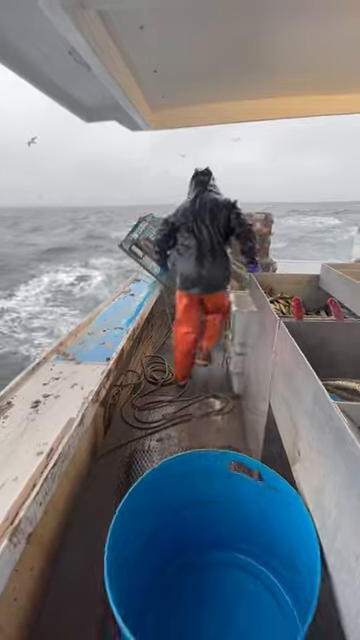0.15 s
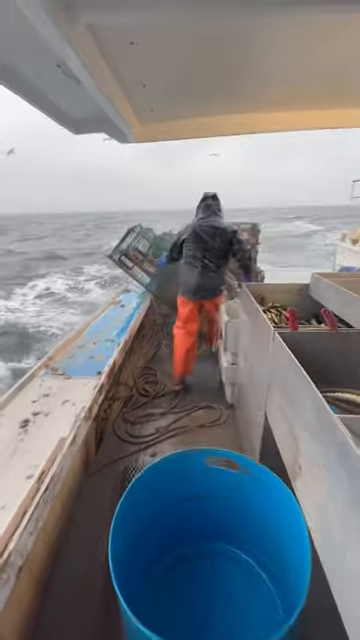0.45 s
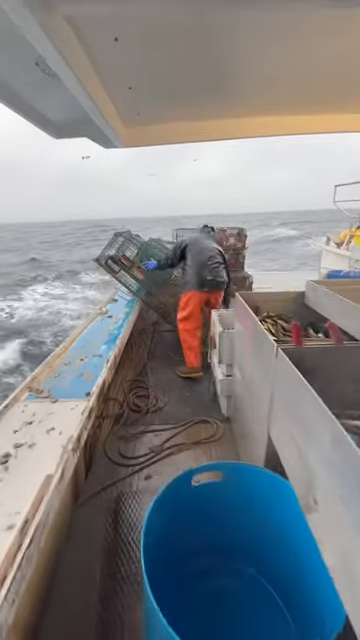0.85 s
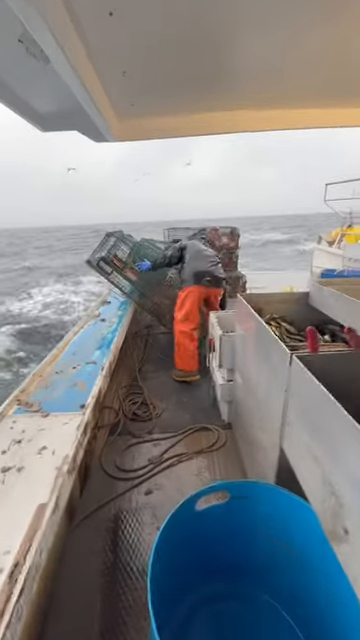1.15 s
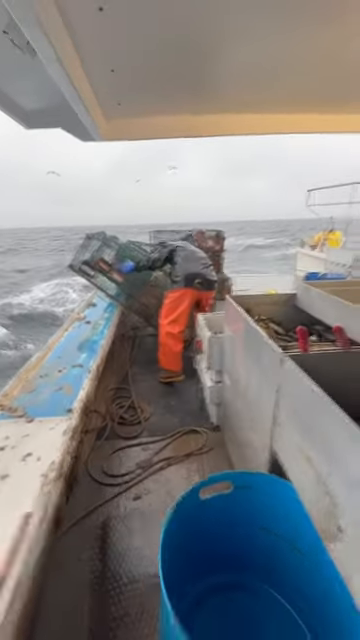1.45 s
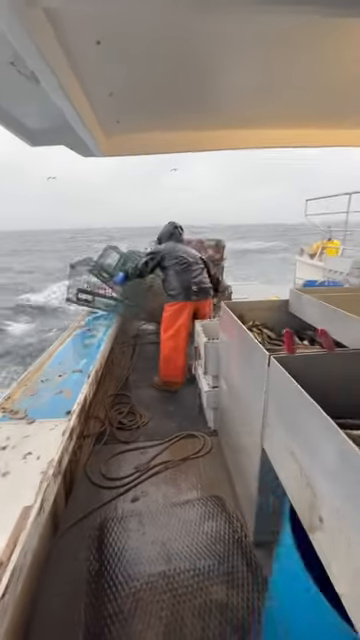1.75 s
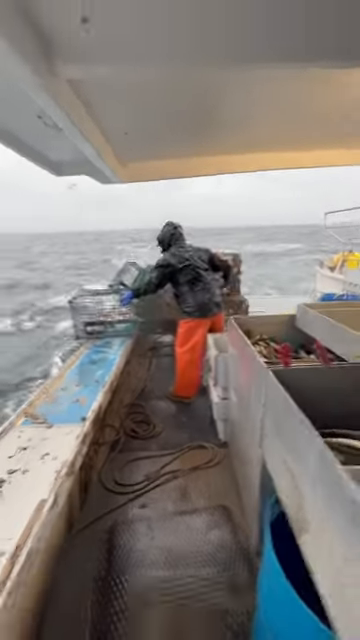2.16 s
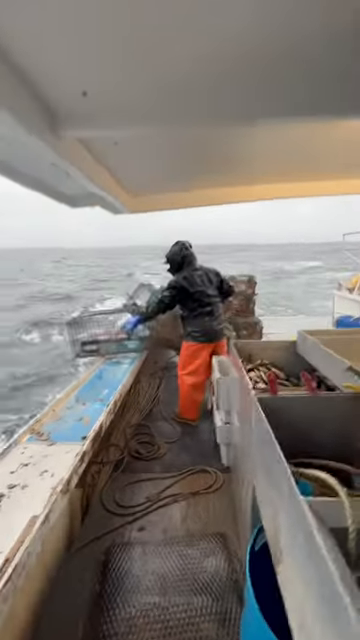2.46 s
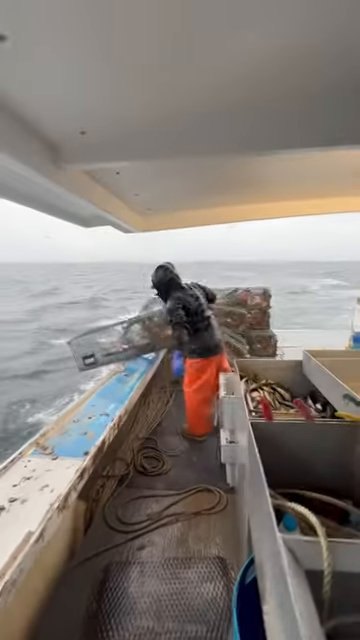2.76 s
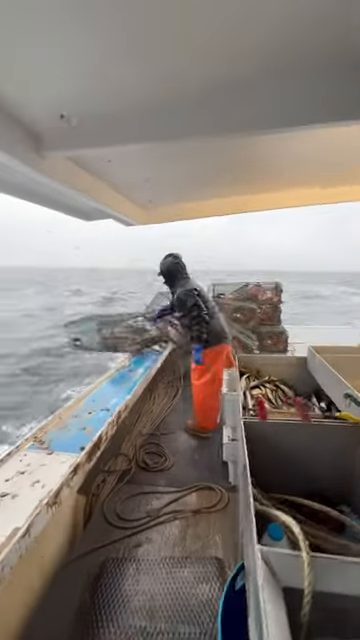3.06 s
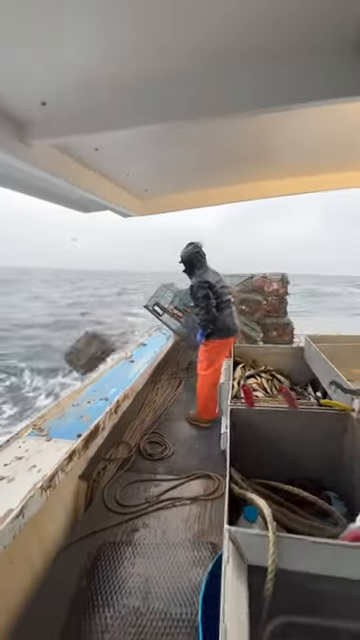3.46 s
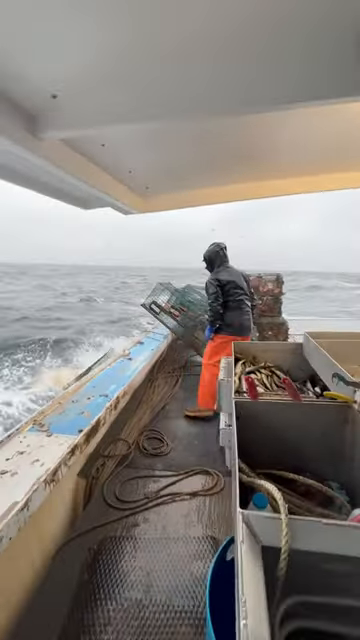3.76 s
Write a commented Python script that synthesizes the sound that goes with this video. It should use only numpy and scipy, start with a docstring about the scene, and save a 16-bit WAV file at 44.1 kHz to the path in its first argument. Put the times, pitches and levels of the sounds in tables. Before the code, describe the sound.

A wire trap knocks on a boat rail: two hollow clunks at 0.2-0.3 s, a faint tap near 0.95, a hard bang at 1.35, then a rapid clattering, grainy scrape from 1.5 to 1.75 and a ringing thunk at 1.95. Softer knocks come at 2.95-3.15; a modest splash swells after 3.6. Low diesel throbs about fifteen times a second throughout, with hissing sea wash and short deck reflections.

```python
"""A diesel runs throughout, throbbing once per engine cycle through the hull of a fishing boat: tones and rumble.
Close by on deck a wire trap knocks on the rail (dying tones and mesh noise) and is dragged along it (grainy noise).
A trap splashes overboard near the end: swelling noise and coarse drops. Sea wash, noise with fizz, hisses alongside.
Two spaced microphone ports pick it up, with a short answer from deck and wheelhouse roof on the rail and hull notes."""
import sys
import numpy as np
from scipy import signal
from scipy.fft import rfft, irfft, next_fast_len
from scipy.io import wavfile
from scipy.ndimage import uniform_filter1d, map_coordinates

SR = 44100
rng = np.random.default_rng(int(sys.argv[2]) if len(sys.argv) > 2 else 0)


def unload_audio(sound):
    """Save the sound as a 16-bit wav file, at the path given as the first command line argument."""
    columns = np.transpose(np.atleast_2d(sound))
    # keep every value between -1 and 1, then stretch to whole-number steps
    steps = np.round(np.clip(columns, -1, 1) * 32767)
    wavfile.write(sys.argv[1], SR, steps.astype(np.int16))


N = 172872  # samples

# Diesel tones at multiples of the engine cycle: order, level_db
ENGINE_ORDERS = [(2, -39), (3, -33), (4, -23), (5, -28.5), (6, -26.5), (7, -18.5), (8, -33.5), (9, -38),
                 (10, -37), (11, -38.5), (12, -45.5)]
# Rise and fall of the whole engine: time_s, level_db
ENGINE_LEVEL = [(0, 1), (.4, -1), (.9, -1), (1.3, 0), (1.6, 1.5), (2, 2), (2.5, 0.5), (2.9, -1.5),
                (3.3, -0.5), (3.6, 0), (3.9, 1)]
# Spectrum of the hull rumble: frequency_hz, relative_level_db_per_hz
RUMBLE_SPECTRUM = [(15, -44), (25, -21), (48, -11.5), (103, -10), (125, -11.5), (152, -12.5), (194, -15.5),
                   (264, -21.5), (320, -23), (420, -27), (700, -120)]
# Hull panels that hum along: frequency_hz, width_hz, relative_level_db
HULL_PANELS = [(231.1, 16.8, -0.5), (264, 16.2, -1.5), (335.6, 60, -6.5)]
# Blows of the trap on the rail: start_s, blow_db, hull_note_hz, hull_note_db,
# rail_focus_hz (loudest part of the ring), rail_db, rattle_db, jingle_db, left_over_right_db
TRAP_KNOCKS = [(.225, -13.5, 486, -10, 810, -4, -19, -30, -2),
               (.326, -16, 343.6, -10, 730, -6.5, -20, -20.5, 0),
               (.948, -27, 343, -30, 604, -11, -21, -31, 5),
               (1.344, -6.5, 346.5, -11.5, 900, -3.5, -16.5, -15.5, 0.5),
               (1.526, -6.5, 354.4, -4, 910, -8.5, -21, -27, -6),
               (1.547, -10.5, 375, -12, 644, -3.5, -11.5, -22, -5),
               (1.574, -7, 365, -6.5, 800, -4, -16, -20, 0),
               (1.607, -13.5, 360.3, -3, 900, -0.5, -15, -28, 0.5),
               (1.64, -18.5, 330, -18.5, 1300, -17, -7.5, -24, -8),
               (1.675, -19.5, 354, -4, 820, 0, -17, -18, -6),
               (1.71, -14.5, 371.7, -2.5, 744, -1.5, -14.5, -26, -1),
               (1.957, -15, 306.3, 3.5, 765, -2, -17.5, -27.5, -1),
               (1.975, -19, 313, -13, 500, -5, -16, -26, -1),
               (2.954, -23.5, 338, -3, 900, -5, -13.5, -34, -5),
               (3.073, -17, 338, -8, 930, -4.5, -38, -28.5, 2),
               (3.151, -17.5, 346, -13, 1420, -0.5, -15.5, -30, -1.5)]
# Ringing modes of the rail: frequency_hz, level_db, t60_s
RAIL_MODES = [(416, -4.5, 0.04), (499, 0.5, 0.2), (555, -6.5, 0.1), (634, 0, 0.16), (702, -3, 0.18),
              (785, -2, 0.071), (858.5, 0.5, 0.068), (926, -5.5, 0.038), (1030, -12, 0.056),
              (1144, -9.5, 0.044), (1336, -9, 0.06), (1580, -12.5, 0.057)]
# Trap dragged along the rail: time_s, rasp_db, jingle_over_rasp_db, rail_ring_over_rasp_db
DRAG_LEVELS = [(1.409, -33, 9, 6), (1.435, -28, -9, -2), (1.47, -27.5, -21, -4), (1.49, -43.5, -20, 3),
               (1.516, -43, -12, 9), (1.526, -25, -10, 1), (1.55, -24, 1.5, 3), (1.563, -28.5, 6.5, 2),
               (1.584, -25.5, 2, 9.5), (1.62, -29, -2, 0.5), (1.66, -27, -11, -0.5), (1.69, -33.5, -4.5, 7),
               (1.715, -28.5, -7, 2), (1.745, -32.5, -18, 6.5), (1.798, -55, -8, 12)]
# Spectrum of the wire mesh: frequency_hz, relative_level_db_per_hz
WIRE_SPECTRUM = [(530, -45), (900, -5), (950, 1.5), (1400, -8.5), (2230, -7.5), (3740, -10), (4400, -20),
                 (6350, -16.5), (9460, -21), (11200, -22.5), (11900, -23), (15400, -90), (22000, -120)]
# Trap hitting the water: time_s, level_db
SPLASH_LEVEL = [(3.5, -63), (3.6, -45), (3.68, -37), (3.78, -40), (3.85, -34), (3.92, -35)]
# Spectrum of the splash: frequency_hz, relative_level_db_per_hz
SLOSH_SPECTRUM = [(400, -120), (600, -10), (1200, 4), (2000, -4), (3500, -11), (5000, -27), (8000, -120)]
# Sea alongside: time_s, surge_db, spray_db
SEA_LEVELS = [(0, -27.5, -37), (.2, -31, -42), (.36, -25, -34.5), (.42, -29.5, -42), (.52, -30, -45.5),
              (.57, -28.5, -41), (.8, -29, -40), (.87, -30, -44), (1.0, -30.5, -48.5), (1.32, -30, -46),
              (1.5, -28.5, -35.5), (1.8, -28.5, -36), (2.1, -29, -40), (2.6, -29.5, -45),
              (2.93, -30.5, -42.5), (3, -26, -40.5), (3.17, -29, -39), (3.42, -29.5, -39.5),
              (3.5, -29.5, -35.5), (3.58, -28.5, -34.5), (3.67, -29, -30.5), (3.78, -29, -35.5),
              (3.85, -27.5, -31), (3.88, -27, -32), (3.92, -28, -33.5)]
# Spectrum of the low surge along the hull: frequency_hz, relative_level_db_per_hz
SURGE_SPECTRUM = [(180, -14), (300, -4.5), (400, -5.5), (650, -9.5), (900, -10.5), (1150, -19.5),
                  (1600, -24.5), (2500, -25.5), (4000, -38.5), (6000, -120)]
# Spectrum of the spray: frequency_hz, relative_level_db_per_hz
SPRAY_SPECTRUM = [(500, -16), (1000, -2), (1400, -8.5), (2300, -8.5), (3500, -7.5), (4800, -13),
                  (6200, -9.5), (9300, -14), (10800, -16.5), (11500, -11), (11950, -40), (13000, -120)]
# Likeness of noise in the left and right channels: frequency_hz, correlation
LEFT_RIGHT_LIKENESS = [(40, .998), (130, 1), (270, 0.99), (570, 0.5), (1200, 0.19), (2550, 0.52),
                       (4500, 0.54), (7000, 0.23), (11400, 1)]
# Level balance of the microphone ports: frequency_hz, left_over_right_db
PORT_LEAN = [(60, -0.5), (110, 1), (190, 1.5), (350, 2.5), (620, 1.5), (1110, -1), (1990, 1.0), (3560, 0.5),
             (6370, 0.5), (11400, 0.5)]
# Phase between the microphone ports: frequency_hz, left_lead_rad
PORT_LEAD = [(60, -.05), (130, -.12), (340, -.25), (860, -1.2), (1810, -.5), (2580, -2.2), (4220, -1.1),
             (4650, -1.6), (5400, 0), (7240, -.3), (8270, -1.4), (9560, -.7), (11600, -3)]

# Engine
CYCLE_HZ, THROB_S = 15.025, .0427  # cycle rate, time at which the cycle phase is zero
THROB_RAD, SPREAD_RAD, LOUDEST_ORDER = 2.54, .53, 7  # phase of the orders and its spread around the loudest
WAVER_DB, DRIFT_RAD = 1.2, .22  # slow wander of each order in level and phase
RUMBLE_DB, HULL_DB = -25.5, -31
PULSE_DB, PULSE_LATE_RAD = 2, 0.86  # rumble swells with each throb
# Trap, rail and mesh
NOTE_T60_S, RATTLE_T60_S, JINGLE_T60_S = 0.46, 0.21, .08
CRACK_T60_S, CRACK_DB = .009, 8
ROUGH_RAD, ROUGH_PER_S = .6, 120  # phase roughness of the ringing
FOCUS_DB_PER_OCT2 = 14  # rail modes weaken away from the focus, per octave squared
JINGLE_HZ = 4600  # rattle below, jingle above
SLIPS_PER_S = 800
# Water
DROPS_PER_S = 400
FIZZ_PER_S, FIZZ_DB = 1500, -11.5
# Deck answer and microphone
DECK_LOW_HZ, DECK_T60_S, DECK_DB = 486, .14, 0  # the answer is cut below DECK_LOW_HZ
CEILING, KNEE, TOP_HZ = .95, 5, 12000  # rounding of peaks (full scale 1), its sharpness, band limit


def engine():
    """Orders of the cycle add up to one throb a cycle, its low part late; the hull rumbles and hums along."""
    turn = 2 * np.pi * CYCLE_HZ * (np.arange(N) / SR - THROB_S)
    tones = np.zeros(N)
    for order, level_db in ENGINE_ORDERS:
        gain = amp(level_db + WAVER_DB * wobble(6)) * np.sqrt(2)
        spread = SPREAD_RAD * (order - LOUDEST_ORDER) ** 2
        tones += gain * np.cos(order * turn + THROB_RAD + spread + DRIFT_RAD * wobble(3.96))
    panels = resonances(HULL_PANELS)
    hum = amp(HULL_DB) * unit(filtered(rng.standard_normal(N), lambda hz: panels(hz) ** 2))
    rumble_db = RUMBLE_DB + 2.26 * wobble(4.92) + PULSE_DB * np.cos(turn - PULSE_LATE_RAD)
    rumble = amp(rumble_db) * rush(RUMBLE_SPECTRUM, patchy_db=0.5)
    return amp(curves(ENGINE_LEVEL)[0]) * (tones + hum + rumble)


def knocks():
    """Each blow sounds a hull note, rings the rail anew and shakes the mesh: a crack, then a dying rattle."""
    ring, rattle_gain, jingle_gain = np.zeros((3, 2, N + SR))  # room for tails past the end
    t = np.arange(SR // 2) / SR
    rough = ROUGH_RAD * np.tile(wobble(ROUGH_PER_S), 2)
    crack = amp(CRACK_DB - 60 * t / CRACK_T60_S)
    for start_s, blow_db, note_hz, note_db, focus_hz, rail_db, rattle_db, jingle_db, pan_db in TRAP_KNOCKS:
        side = amp(blow_db + pan_db * np.array([[.5], [-.5]]))
        start = round(start_s * SR)
        at = slice(start, start + len(t))
        jitter = rough[at]
        tone = amp(note_db - 60 * t / NOTE_T60_S) * np.sin(2 * np.pi * note_hz * t + jitter)
        # every blow excites the modes a little differently in level and pitch
        level_luck, pitch_luck = rng.normal(0, 1, (2, len(RAIL_MODES)))
        for k, (hz, level_db, t60_s) in enumerate(RAIL_MODES):
            focus_db = -FOCUS_DB_PER_OCT2 * np.log2(hz / focus_hz) ** 2
            gain = amp(level_db + rail_db + focus_db + 2 * level_luck[k] - 60 * t / t60_s)
            cycles = hz * (1 + 0.034 * pitch_luck[k]) * t + k * k / 7
            tone += gain * np.sin(2 * np.pi * cycles + np.roll(jitter, k * SR // 30))
        ring[:, at] += side * tone * (1 - np.exp(-t / 0.0032))  # soft onset
        rattle_gain[:, at] += side * amp(rattle_db) * (crack + amp(-60 * t / RATTLE_T60_S))
        jingle_gain[:, at] += side * amp(jingle_db) * (crack + amp(-60 * t / JINGLE_T60_S))
    rattle, jingle = wire(patchy_db=2.5)
    return ring[:, :N], rattle_gain[:, :N] * rattle + jingle_gain[:, :N] * jingle


def drag():
    """The mesh slips along the rail: a grainy rasp, and the slips keep the rail ringing."""
    rasp_db, jingle_db, ring_db = curves(DRAG_LEVELS)
    t = np.arange(N) / SR
    first_s, last_s = DRAG_LEVELS[0][0], DRAG_LEVELS[-1][0]
    fade = np.clip(np.minimum(t - first_s, last_s - t) / 0.032, 0, 1)
    contact = fade * amp(rasp_db + 1.77 * wobble(70.44))
    slips = specks(SLIPS_PER_S, spread_db=0)
    # the faster a mode dies, the wider its resonance
    rail = resonances([(hz, 4.1 / t60_s, db) for hz, db, t60_s in RAIL_MODES])
    ring = amp(ring_db) * unit(filtered(slips, rail))
    rattle, jingle = wire(patchy_db=-2.5, grains=0.52 * slips)
    return contact * ring, contact * (rattle + amp(jingle_db) * jingle)


def wire(patchy_db, grains=0):
    """Mesh noise split into its rattle and its high jingle, each rms 1."""
    mesh = rush(WIRE_SPECTRUM, patchy_db, grains)
    high = filtered(mesh, lambda hz: 1 / (1 + (JINGLE_HZ / (hz + 1)) ** 8))
    return unit(mesh - high), unit(high)


def splash():
    """The trap hits the water: coarse drops as random clicks within patchy slosh noise."""
    drops = 0.87 * np.array([specks(DROPS_PER_S, spread_db=-3), specks(DROPS_PER_S, spread_db=3)])
    level_db = curves(SPLASH_LEVEL)[0] + 1.7 * wobble(30.05)
    return amp(level_db) * rush(SLOSH_SPECTRUM, patchy_db=3, grains=drops)


def sea():
    """Low surge along the hull and spray fizzing with tiny clicks, each swelling by itself."""
    surge_db, spray_db = curves(SEA_LEVELS)
    fizz = amp(FIZZ_DB) * np.array([specks(FIZZ_PER_S, spread_db=5.5), specks(FIZZ_PER_S, spread_db=4.5)])
    surge = amp(surge_db + 0.57 * wobble(8.04)) * rush(SURGE_SPECTRUM, patchy_db=2.0)
    spray = amp(spray_db + 0.34 * wobble(6.7)) * rush(SPRAY_SPECTRUM, patchy_db=0.5, grains=fizz)
    return surge + spray


def deck(x):
    """Short answer of deck and wheelhouse roof: a decaying noise tail, unlike at the two ports."""
    t = np.arange(SR // 3) / SR
    tail = rng.standard_normal((2, len(t))) * amp(-60 * t / DECK_T60_S) * (t > .003)
    wet = signal.fftconvolve(x, tail / np.linalg.norm(tail[0]), axes=1)[:, :N]
    return x + amp(DECK_DB) * filtered(wet, lambda hz: 1 / (1 + (DECK_LOW_HZ / (hz + 1)) ** 4))


def amp(db):
    """Decibels to gain."""
    return 10 ** (np.asarray(db) / 20)


def unit(x):
    """Scaled to rms 1."""
    return x / np.sqrt(np.mean(x ** 2) + 1e-20)


def along(points, hz):
    """(frequency_hz, value) points read on a log frequency axis."""
    f, v = np.transpose(points)
    return np.interp(np.log(hz + 1), np.log(f + 1), v)


def curves(rows):
    """One value per sample for each column after the time."""
    time_s, *columns = np.transpose(rows)
    return [np.interp(np.arange(N) / SR, time_s, column) for column in columns]


def wobble(rate):
    """A smooth random curve, rate knots a second."""
    knots = rng.standard_normal(int(N * rate / SR) + 4)
    return map_coordinates(knots, [np.arange(N) * rate / SR])


def filtered(x, response):
    """x times a complex response of frequency."""
    m = next_fast_len(N + SR // 2)
    return irfft(rfft(x, m) * response(np.fft.rfftfreq(m, 1 / SR)), m)[..., :N]


def resonances(rows):
    """Causal response of (frequency_hz, width_hz, level_db) resonances, alternating in sign."""
    def response(f):
        return sum((-1) ** k * amp(db) * 1j * f * width / (centre ** 2 - f * f + 1j * f * width)
                   for k, (centre, width, db) in enumerate(rows))
    return response


def specks(per_s, spread_db):
    """Random clicks of uneven size, rms 1."""
    hits = rng.random(N) < per_s / SR
    size = amp(spread_db * np.minimum(rng.exponential(size=N), 3))
    return unit(hits * size * rng.standard_normal(N))


def rush(spectrum, patchy_db, grains=0):
    """Stereo noise of rms 1 with patches of random gain and optional grains."""
    z = signal.stft(rng.standard_normal((2, N)), nperseg=512)[2]
    field = rng.standard_normal(z.shape[1:])
    field = uniform_filter1d(uniform_filter1d(field, 6, 0), 14, 1)  # smooth over frequency, then time
    pair = signal.istft(z * amp(patchy_db * unit(field)), nperseg=512)[1][:, :N] + grains

    def mid_side(hz):
        turn = np.arccos(np.clip(along(LEFT_RIGHT_LIKENESS, hz), -1, 1)) / 2
        return amp(along(spectrum, hz)) * [np.cos(turn), np.sin(turn)]

    mid, side = filtered(pair, mid_side)
    return unit(np.array([mid + side, mid - side]))


def scene():
    """Everything on deck; only the hull notes and rail ringing get the deck's answer."""
    knock_ring, knock_mesh = knocks()
    drag_ring, drag_mesh = drag()
    return engine() + deck(knock_ring + drag_ring) + knock_mesh + drag_mesh + splash() + sea()


def record(dry):
    """Two spaced ports hear the scene slightly apart; peaks round off, nothing is kept above the band limit."""
    half = np.array([[.5], [-.5]])  # left, right

    def port_response(hz):
        return amp(half * along(PORT_LEAN, hz)) * np.exp(1j * half * along(PORT_LEAD, hz))

    ports = filtered(dry, port_response)
    rounded = ports / (1 + np.abs(ports / CEILING) ** KNEE) ** (1 / KNEE)
    return filtered(rounded, lambda hz: hz < TOP_HZ)


dry = scene()
out = record(dry)
unload_audio(out)
```